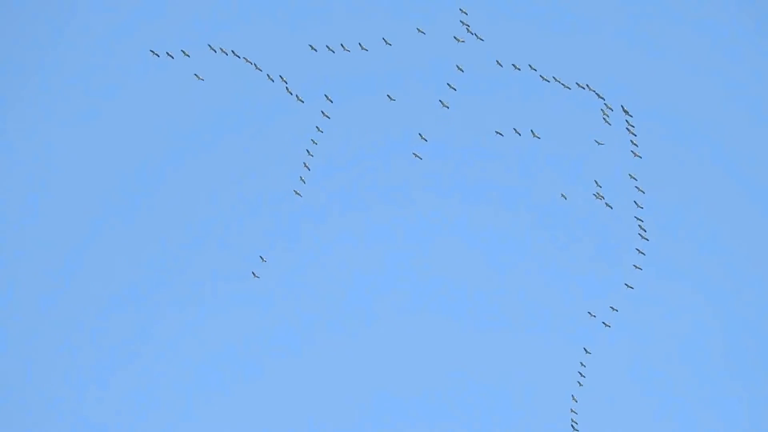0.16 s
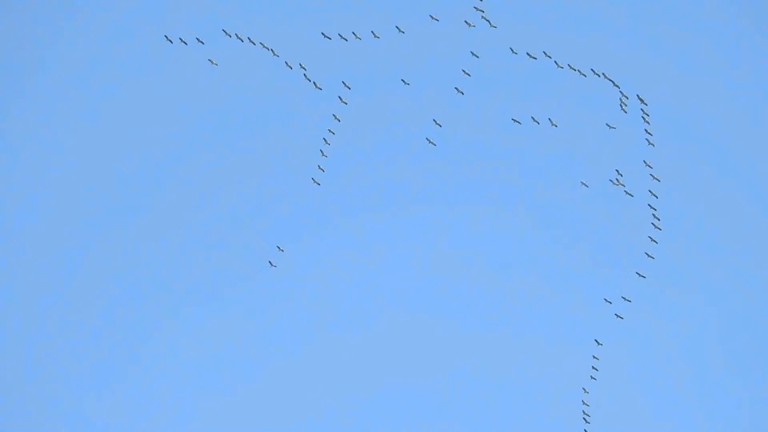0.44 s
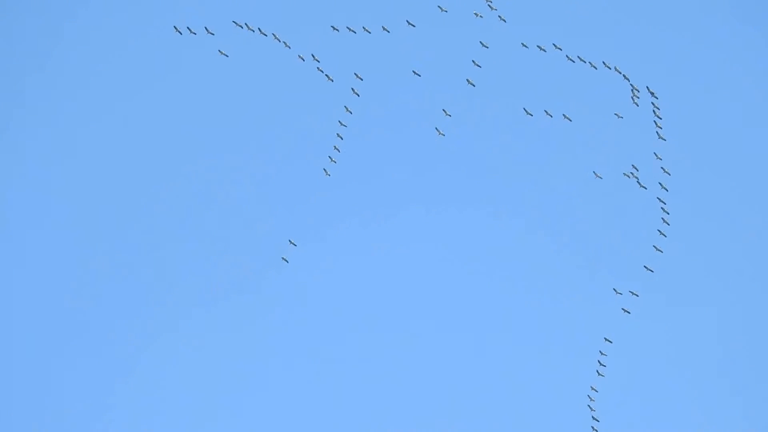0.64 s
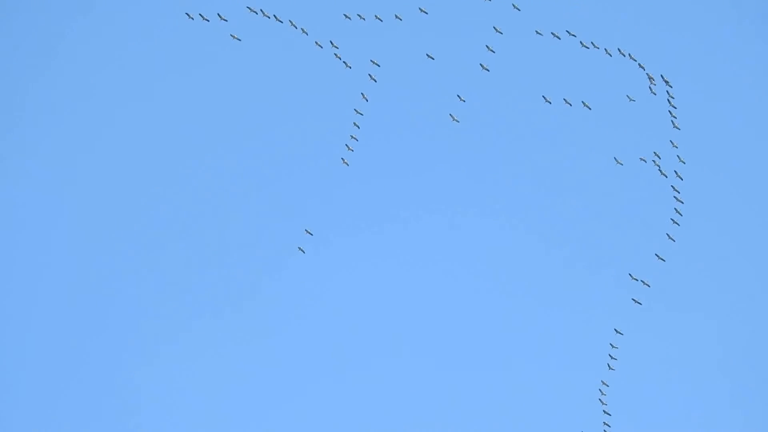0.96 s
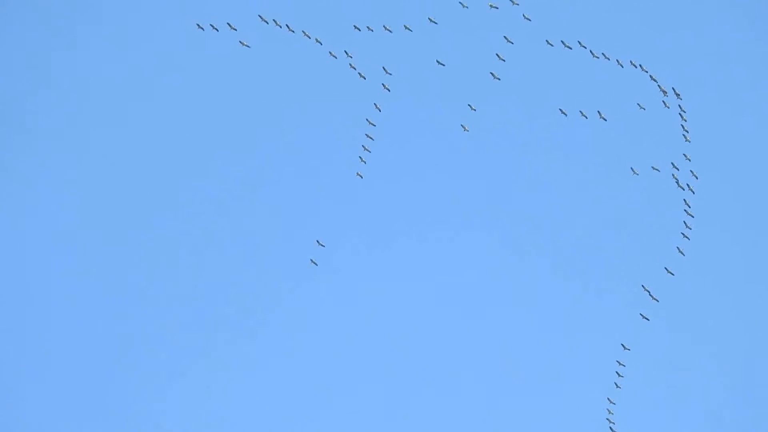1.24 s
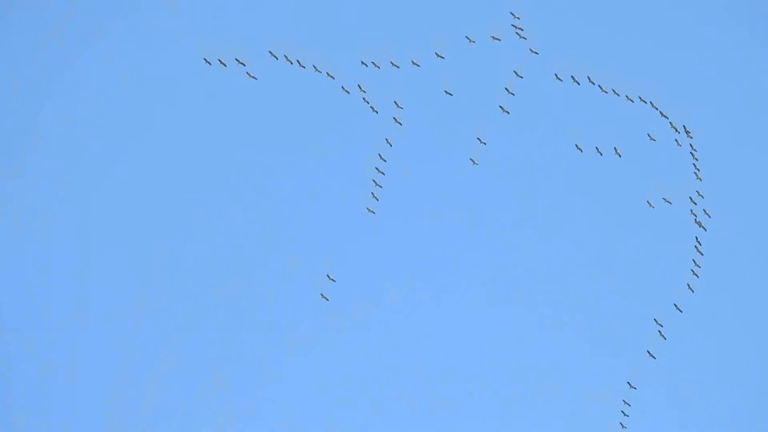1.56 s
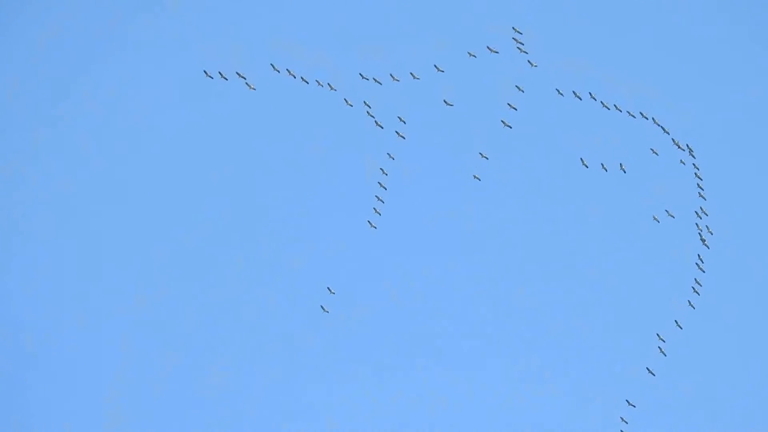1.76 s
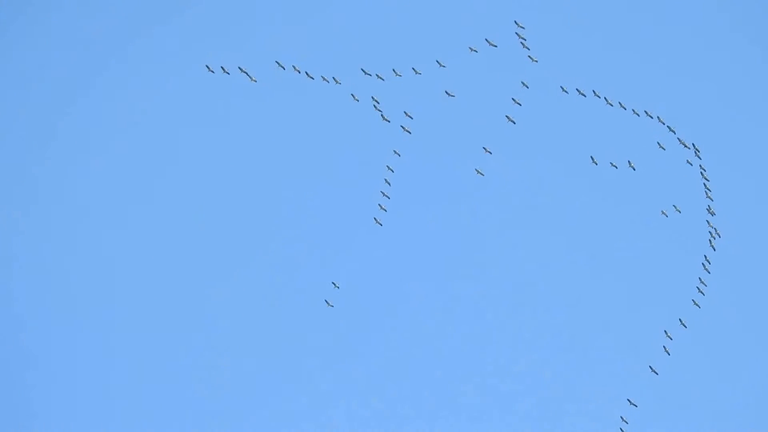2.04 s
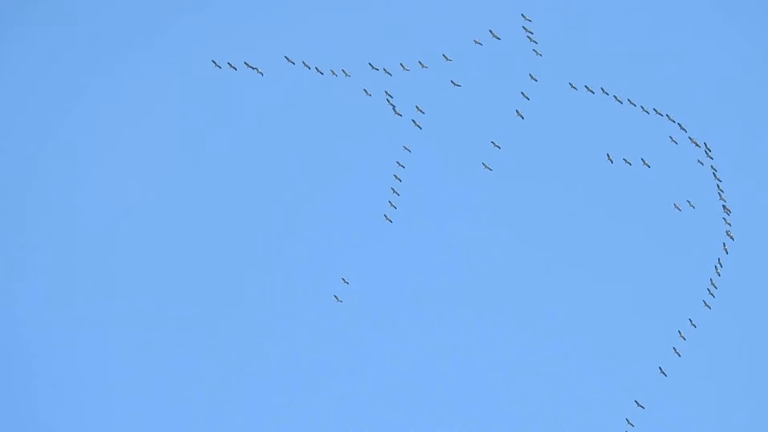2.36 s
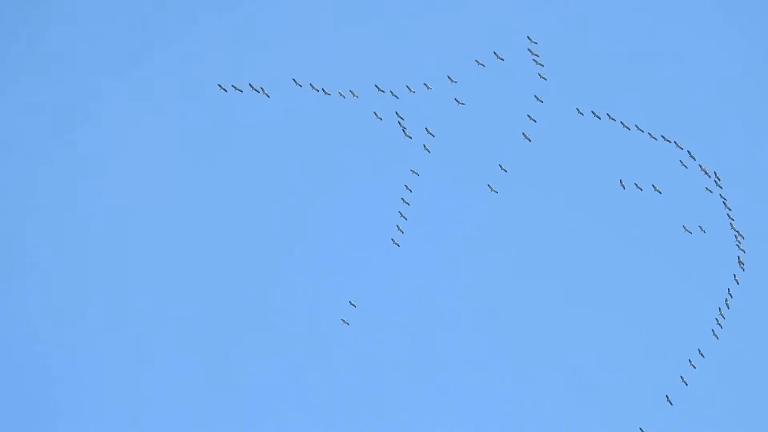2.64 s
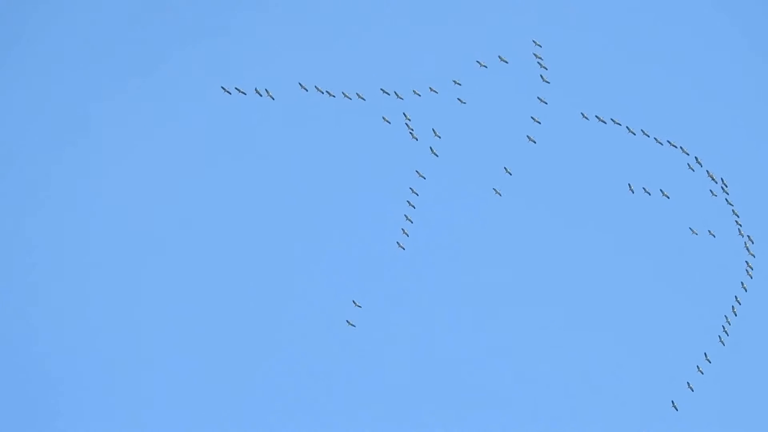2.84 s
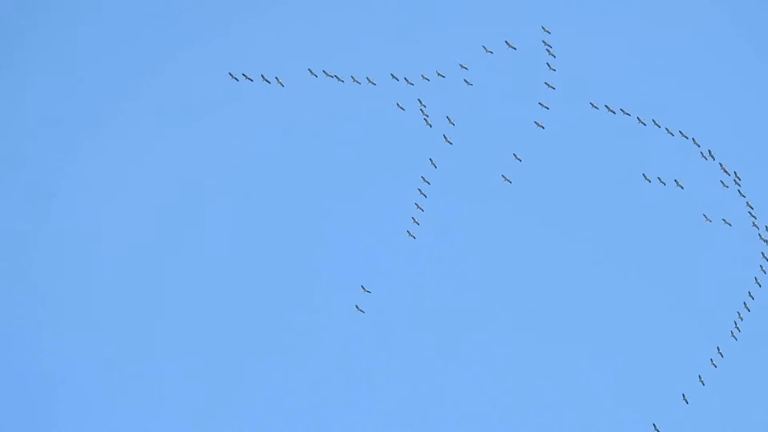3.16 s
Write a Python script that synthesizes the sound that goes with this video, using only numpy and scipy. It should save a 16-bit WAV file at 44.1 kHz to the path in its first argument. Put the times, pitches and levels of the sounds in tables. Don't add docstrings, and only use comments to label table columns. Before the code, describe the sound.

Distant cranes call high overhead in short overlapping bursts of bugled notes and rolling purrs, with pauses between. A close songbird chirps thinly twice. Steady low traffic hum and soft air, outdoors, small camera microphone.

```python
import sys
import numpy as np
from scipy import signal
from scipy.fft import rfft, irfft, next_fast_len
from scipy.io import wavfile
from scipy.ndimage import uniform_filter1d

SR = 44100
rng = np.random.default_rng(int(sys.argv[2]) if len(sys.argv) > 2 else 0)


def to_wav(s):
    ch = np.atleast_2d(s).T
    pcm = np.round(np.clip(ch, -1, 1) * 32767)
    wavfile.write(sys.argv[1], SR, pcm.astype(np.int16))


def linear_from_db(decibels):
    return 10 ** (np.asarray(decibels, float) / 20)


N = 145971


def span(start, length):
    first = max(int(start * SR), 0)
    at = slice(first, min(first + int(length * SR) + 2000, N))
    return at, np.arange(at.stop - first) / SR


def shape(t, length, attack=0.0033, release=0.023):
    rise = np.clip(t / attack, 0, 1)
    fall = np.clip((length - t) / release + .5, 0, 1)
    return np.sin(np.pi / 2 * rise * fall) ** 2


def walk(rate, size=N):
    hold = max(int(SR / rate), 1)
    steps = np.repeat(rng.standard_normal(size // hold + 1), hold)
    return 1.3 * uniform_filter1d(uniform_filter1d(steps, hold), hold)[:size]


def unit(x):
    return x / np.sqrt(np.mean(x ** 2))


OVERTONES_DB = [0, -18, -14, -24, -28]


def windpipe(hz, over_db, partials_db=OVERTONES_DB):
    size = len(hz)
    jitter, waver_db, roughness = 0.0081, 1.3, 0.419
    phase = 2 * np.pi * np.cumsum(hz * (1 + jitter * walk(120.4, size))) / SR

    def waver():
        return linear_from_db(waver_db * walk(45, size)) * (1 + roughness * walk(175.2, size))

    tone = np.sin(phase) * waver()
    for k, partial_db in enumerate(partials_db, start=2):
        tone = tone + np.sin(k * phase + k * k) * linear_from_db(over_db + partial_db) * waver()
    return np.sqrt(2) * tone


# (time [s], length [s], pitch [Hz], level [dB], overtones [dB])
BUGLES = [(.415, 0.04, 830, -45, -11), (.52, 0.061, 863.3, -40, -11), (.655, 0.121, 850.9, -45.5, -6.5),
          (1.465, 0.0816, 826.5, -43.5, -8), (1.54, 0.0489, 839.4, -45, -3.5),
          (1.59, 0.1833, 844.7, -45.5, -1.5), (1.535, 0.023, 1185, -35.5, -20),
          (1.58, 0.132, 1174, -35.5, -34.5), (1.71, .08, 1172, -47, -20.5), (1.585, .135, 1013, -47.5, -4),
          (1.82, 0.061, 910, -66, 4.5), (1.90, 0.05, 1300, -53, -36.5), (2.08, 0.051, 843.2, -43.5, -12.5),
          (2.17, .10, 864, -45.5, -15.5), (2.31, 0.024, 1100, -49.5, -13),
          (2.349, 0.0268, 1009, -46.5, -6.5), (2.79, 0.0288, 894.2, -49, -2),
          (2.815, 0.052, 857.6, -45.5, -4), (2.875, 0.036, 840.3, -46, -7.5),
          (3.27, 0.084, 1000, -48.5, -16), (.003, 0.03, 930, -50, -20), (.045, 0.11, 948.1, -44, -20),
          (.025, .08, 1020, -47, -20), (.17, .08, 945, -53, -21), (.1, .07, 650, -57.5, -20.5)]
# (time [s], length [s], pitch [Hz], level [dB], overtones [dB])
BRASS = [
    (0.331, 0.079, 858, -46.5, -2.5),
]
BRASS_DB = [-0.5, -18, -12, -11, -12]


def bugles():
    out = np.zeros(N)
    for table, partials_db in ((BUGLES, OVERTONES_DB), (BRASS, BRASS_DB)):
        for start, length, hz, db, over_db in table:
            at, t = span(start, length)
            pitch = hz * (1 - 0.01 * (2 * t / length - 1) ** 2)
            out[at] += linear_from_db(db) * shape(t, length) * windpipe(pitch, over_db, partials_db)
    return out


# (time [s], length [s], starting pitch [Hz], level [dB], overtones [dB])
SIGHS = [
    (0.462, 0.18, 1161, -43.5, -21),
    (.70, 0.11, 832.8, -47, -22.5),
    (1.768, 0.0425, 794, -52.5, -23),
    (2.27, 0.047, 802.1, -49, -11.5),
    (2.385, 0.078, 1010, -49.5, -3.5),
    (2.418, 0.13, 672, -54.5, -21),
]


def sighs():
    out = np.zeros(N)
    for start, length, hz, db, over_db in SIGHS:
        at, t = span(start, length)
        sagging = hz * (1 - 0.44 * t)
        out[at] += linear_from_db(db) * shape(t, length) * windpipe(sagging, over_db)
    return out


CROAK_OVERTONES_DB = [0, -2.5, -16.5, -22, -26]
# (time [s], length [s], pitch [Hz], level [dB], beat rate [1/s])
ROLLS = [(.002, 0.23, 1032, -51, 57), (0.515, .095, 948, -41.5, 61), (0.587, .155, 1011, -46, 47),
         (0.651, 0.12, 1260, -54.5, 48), (0.678, 0.065, 916, -40, 77), (1.254, 0.18, 1056, -56.5, 20),
         (2.069, 0.085, 937, -49, 43), (2.168, 0.1233, 933, -44.5, 53), (2.275, 0.095, 1184, -54.5, 35),
         (2.477, 0.06, 1504, -57.5, 41), (2.502, 0.07, 1304, -57, 60), (2.47, .12, 930, -56.5, 50),
         (2.802, 0.19, 1927, -58.5, 36), (2.872, 0.11, 1099, -50.5, 31), (3.214, 0.22, 782, -51.5, 35)]


def purrs():
    out = np.zeros(N)
    for start, length, hz, db, rate in ROLLS:
        at, t = span(start, length)
        beat = np.cumsum(rate * (1 + .2 * walk(rate, len(t)))) / SR % 1
        pulse = np.sin(np.pi * beat ** 0.417) ** 0.87
        voice = windpipe(hz * (1 + .09 * (.4 - beat)), -17.5, CROAK_OVERTONES_DB)
        out[at] += linear_from_db(db + 1) * shape(t, length) * pulse * voice
    return out


# (time [s], peak level [dB], pitch [Hz])
CROAKS = [(.441, -42.5, 808), (.508, -35.5, 1151), (.564, -40.5, 976), (.612, -36, 1000), (.647, -32, 966),
          (1.582, -36, 1171), (2.067, -39, 930), (2.125, -40, 941), (2.162, -35.5, 997), (2.204, -43, 1128),
          (2.215, -42, 925), (2.242, -39, 908), (2.788, -47, 899), (2.874, -46.5, 946), (2.925, -47, 954)]


def croaks():
    out = np.zeros(N)
    decay_s = 0.014
    for start, db, hz in CROAKS:
        at, t = span(start - .002, decay_s)
        beat = np.clip(t / 0.002, 0, 1) * np.exp(-(t / decay_s) ** 2)
        falling = hz * (1 + 0.06 * (.5 - np.tanh(t / decay_s)))
        out[at] += linear_from_db(db - 1) * beat * windpipe(falling, -11.5, CROAK_OVERTONES_DB)
    return out


# (time [s], length [s], centre [Hz], level [dB])
HOARSE = [(.34, 0.02, 4400, -56), (.425, 0.03, 4320, -54.5), (.41, .06, 2600, -56.5),
          (.505, .275, 2320, -59.5), (1.466, 0.07, 2605, -60.5), (1.528, 0.045, 2700, -50),
          (1.572, 0.11, 2990, -47), (1.6, 0.15, 3780, -54.5), (2.065, 0.066, 3400, -55),
          (2.128, 0.17, 2810, -60), (2.787, .165, 3933, -59.5), (2.788, .17, 1490, -56),
          (.5, .27, 1300, -55.5)]


def hoarse_air():
    out = np.zeros(N)
    buzz_hz, buzz_share = 169.26, 0.6
    for start, length, hz, db in HOARSE:
        at, t = span(start, length)
        size = len(t)
        cycles = np.cumsum(buzz_hz * (1 + .01 * walk(60, size))) / SR
        pulses = unit(np.diff(np.floor(cycles), prepend=0))
        breath = buzz_share * pulses + (1 - buzz_share) * rng.standard_normal(size)
        throat = signal.butter(4, [hz / 1.5, hz * 1.45], "band", fs=SR, output="sos")
        flicker = linear_from_db(db + 1.5 * walk(120, size))
        swell = shape(t, length, .2 * length, .5 * length)
        out[at] += flicker * swell * unit(signal.sosfilt(throat, breath))
    return out


def whistles(table, settle, warble, attack):
    out = np.zeros(N)
    for start, length, from_hz, to_hz, db in table:
        at, t = span(start, length)
        slide = (1 - np.exp(-t / length / settle)) / (1 - np.exp(-1 / settle))
        hz = (from_hz + (to_hz - from_hz) * slide) * (1 + warble * walk(250, len(t)))
        tone = np.sqrt(2) * np.sin(2 * np.pi * np.cumsum(hz) / SR)
        out[at] += linear_from_db(db) * shape(t, length, attack, 0.0026) * tone
    return out


def echo(x, t60, alike):
    t = np.arange(SR // 2) / SR
    decay = linear_from_db(-60 * t / t60) * np.clip(t / 0.0056, 0, 1)
    mid, side = rng.standard_normal((2, len(t))) * decay
    pair = np.sqrt(1 + alike) * mid + np.sqrt(1 - alike) * side * np.array([[1], [-1]])
    pair = pair / np.sqrt(np.sum(pair ** 2) / 2)
    return signal.fftconvolve(x[None], pair, axes=1)[:, :N]


# (time [s], length [s], from [Hz], to [Hz], level [dB])
CHIRPS = [
    (.285, 0.0496, 7840, 7106, -29.5),
    (.292, 0.0427, 6310, 6860, -35.5),
]
# (time [s], length [s], from [Hz], to [Hz], level [dB])
SLIDES = [
    (2.604, 0.0098, 7900, 7800, -46),
    (2.614, .018, 7800, 7520, -30.5),
    (2.643, .013, 7420, 7300, -26.5),
    (2.659, .021, 7440, 7453, -30),
    (2.640, 0.035, 6800, 6600, -56.5),
]


def near_songbird():
    chirps = whistles(CHIRPS, settle=0.36, warble=0.0043, attack=0.017)
    slides = whistles(SLIDES, settle=1.3, warble=0.0033, attack=0.004)
    ringing = echo(linear_from_db(1.5) * chirps + linear_from_db(-1) * slides, t60=0.39, alike=0.75)
    near = chirps + slides + ringing
    right = np.roll(near[1], 1)
    return linear_from_db(-3.0) * np.array([near[0], right])


# (time [s], length [s], from [Hz], to [Hz], level [dB])
CHATTER = [
    (0.001, .1, 5250, 4595, -58),
    (.13, 0.083, 5410, 4593, -56),
    (.72, 0.0446, 4150, 4750, -58),
    (.765, .075, 4810, 4400, -56.5),
    (.85, 0.23, 4000, 3353, -63.5),
    (.94, 0.12, 6700, 6280, -63.5),
    (1.255, 0.042, 6950, 6450, -52.5),
    (2.48, 0.2, 4300, 3945, -61),
]
# (time [s], length [s], from [Hz], to [Hz], level [dB])
WHISTLES = [
    (1.30, 0.084, 3114, 3170, -63.5),
    (1.88, 0.098, 4106, 4000, -59),
    (1.985, 0.0595, 3960, 3630, -54.5),
    (3.14, 0.048, 3763, 3530, -63),
]


def far_songbirds():
    twitters = whistles(CHATTER, settle=1.5, warble=.1, attack=0.013)
    thin = whistles(WHISTLES, settle=1.6, warble=0.024, attack=0.01)
    return echo(twitters + thin, t60=0.24, alike=0.98)


def read(table, hz):
    table = np.array(table)
    return np.interp(np.log(hz + 1), np.log(table[:, 0]), table[:, 1])


# (frequency [Hz], side minus mid [dB])
WIDTH = [(60, -17.5), (100, -21), (180, -16), (310, -12.5), (540, -11), (940, -11), (1630, -7.5),
         (2820, -3), (4890, -2), (8470, -1.5)]


def drifting_noise(spectrum, db, lo, hi, swell):
    hz, out = np.fft.rfftfreq(N, 1 / SR), np.zeros((2, N))
    colour = linear_from_db(read(spectrum, hz)) * (hz >= lo) * (hz < hi)
    mid, side = rfft(rng.standard_normal((2, N))) * colour
    gain = 1 / np.sqrt(np.mean(irfft(mid, N) ** 2))
    pair = gain * (mid + side * linear_from_db(read(WIDTH, hz)) * np.array([[1], [-1]]))
    for octave in np.arange(4, 14.5, .5):
        if lo / 1.5 < 2 ** octave < hi * 1.5:
            band = np.clip(1 - 2 * np.abs(np.log2(hz + 1) - octave), 0, 1)
            out += irfft(pair * band, N) * linear_from_db(db + 0.38 * swell + 1.21 * walk(5.98))
    return out


# (frequency [Hz], density [dB per Hz])
HUM = [(15, -42.5), (25, -29.5), (75, -0.5), (102, 0), (194, -7), (275, -18), (467, -20), (530, -22.5),
       (700, -17.5), (910, -43), (1540, -120)]
# (time [s], level [dB])
TRAFFIC = [
    (0.0, -44),
    (0.79, -41.5),
    (0.82, -44),
    (1.84, -41.5),
    (3.3, -41.5),
]


def traffic(swell):
    level_db = np.interp(np.arange(N) / SR, *np.array(TRAFFIC).T)
    return drifting_noise(HUM, level_db, 0, 700, swell)


# (frequency [Hz], density [dB per Hz])
AIR = [(700, -4), (1030, -2.5), (1500, -8.5), (2380, -19), (4280, -17.5), (7000, -19.5), (8300, -25.5),
       (11000, -27.5)]


def open_air(swell):
    return drifting_noise(AIR, -52.5, 700, SR, swell)


def scene():
    flock = bugles() + sighs() + purrs() + croaks() + hoarse_air()
    overhead = flock + linear_from_db(-7.5) * echo(flock, t60=.3, alike=0.84)
    swell = walk(0.928)
    return overhead + near_songbird() + far_songbirds() + traffic(swell) + open_air(swell)


def roll_off(x):
    return signal.sosfilt(signal.butter(12, 10800, fs=SR, output="sos"), x)


def record(dry):
    room = next_fast_len(N)
    hz, lines = np.fft.rfftfreq(room, 1 / SR), rfft(dry, room)

    def part(lo, hi):
        return irfft(lines * (hz >= lo) * (hz < hi), room)[:, :N]

    def level_db(x, size):
        return 10 * np.log10(uniform_filter1d(np.mean(x ** 2, axis=0), size) + 1e-14)

    calls_db = level_db(part(790, 5500), 7000) + 49
    out = part(0, 6200)
    for lo in np.arange(6200, 10800, 160):
        band = part(lo, lo + 160)
        threshold_db = -79 + 3 * (lo / 1000 - 8) + 1.04 * calls_db + 3.5 * walk(14)
        kept = level_db(band, 2500) > threshold_db
        out = out + band * uniform_filter1d(1. * kept, 700)
    return roll_off(out)


dry = scene()
out = record(dry)
to_wav(out)
```